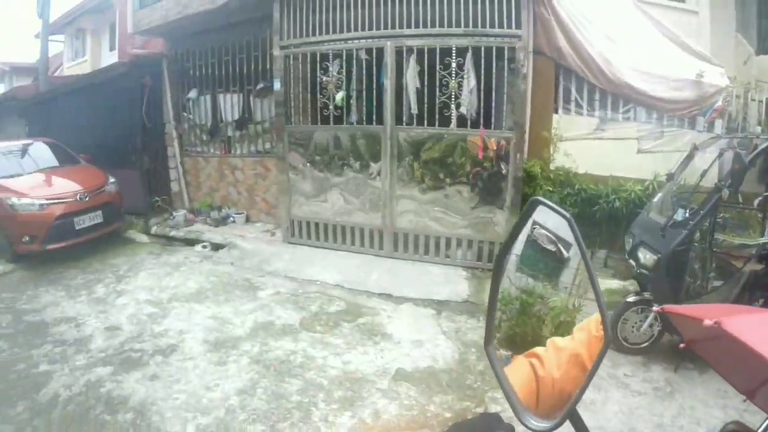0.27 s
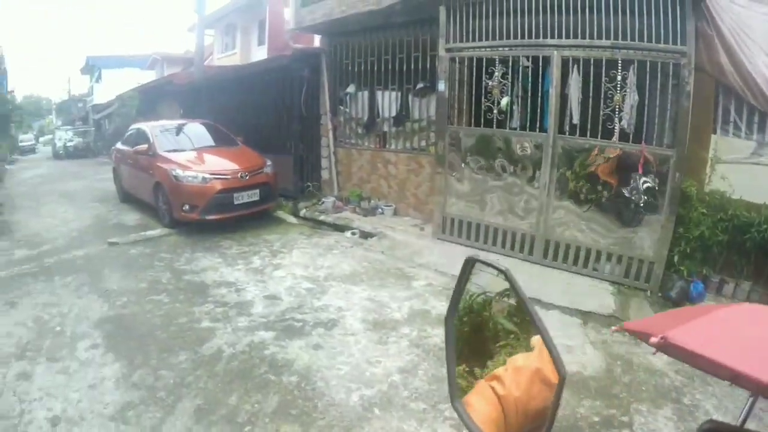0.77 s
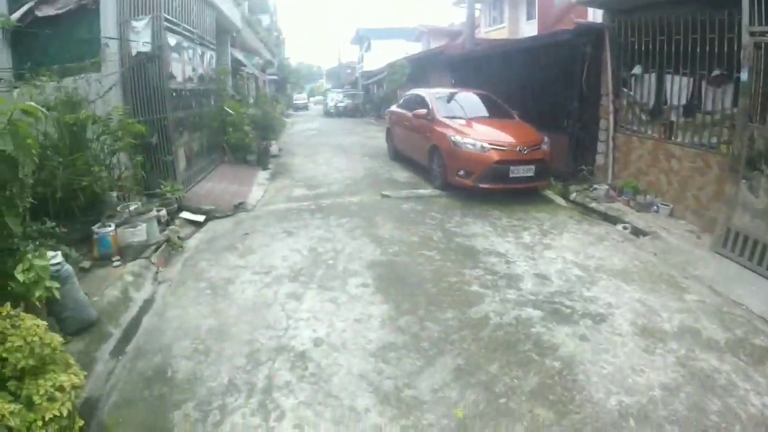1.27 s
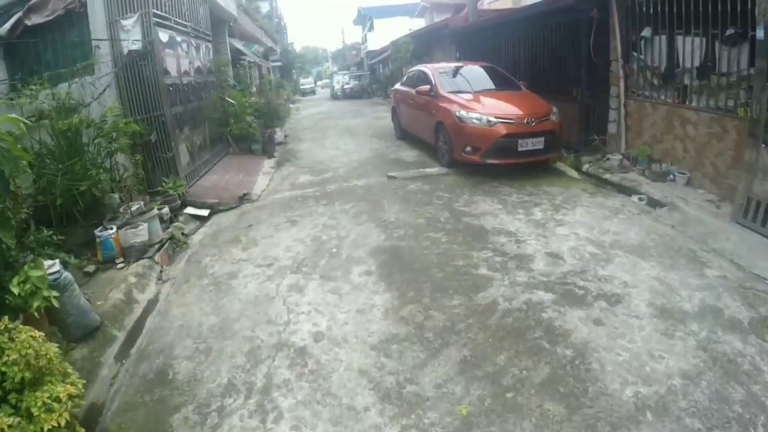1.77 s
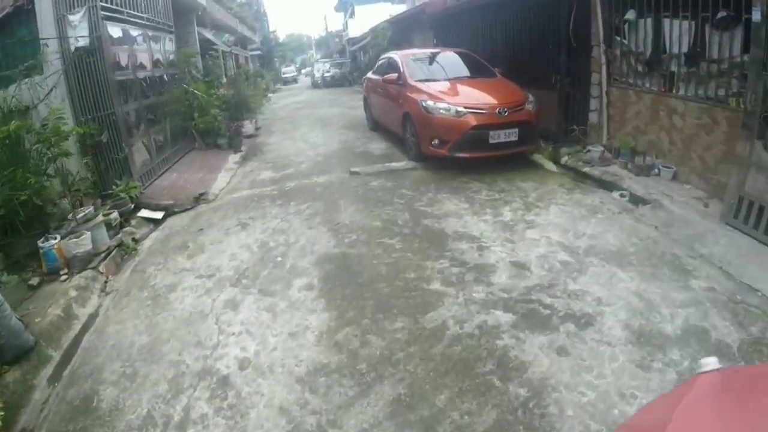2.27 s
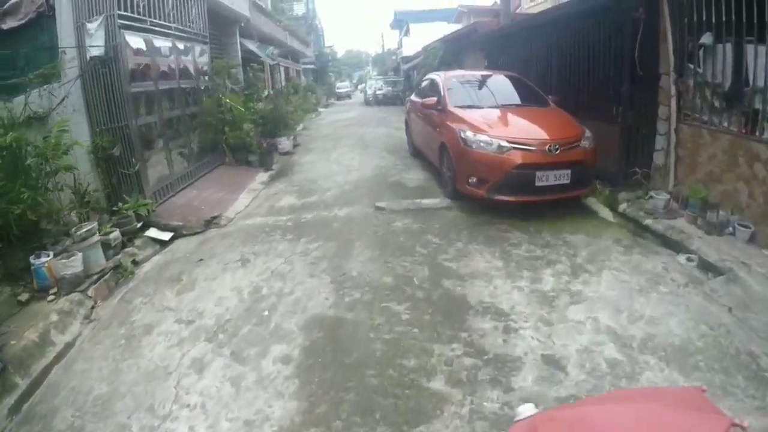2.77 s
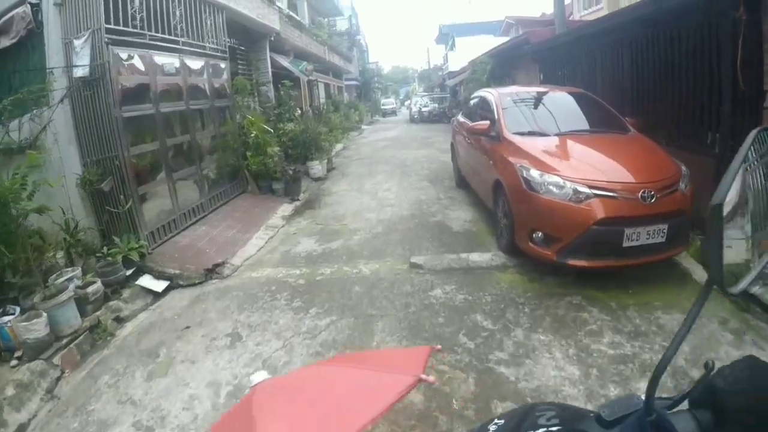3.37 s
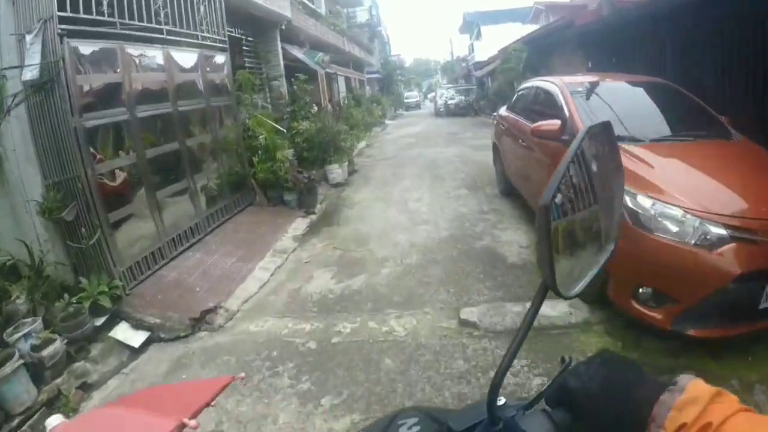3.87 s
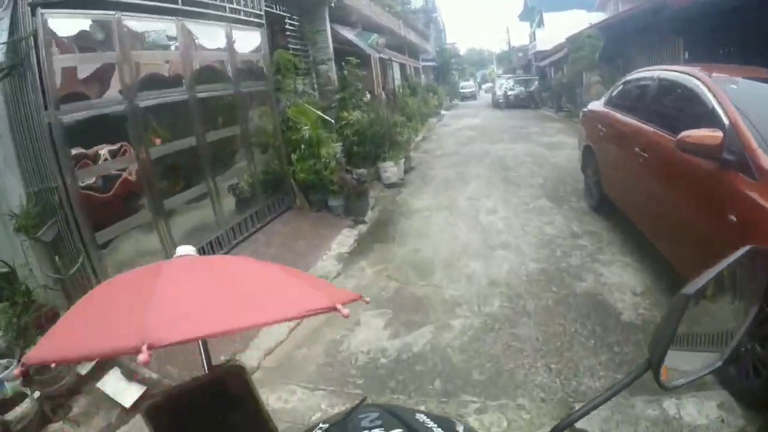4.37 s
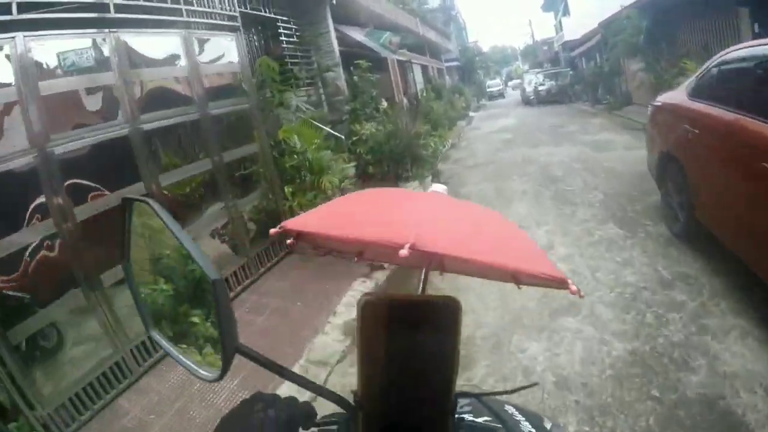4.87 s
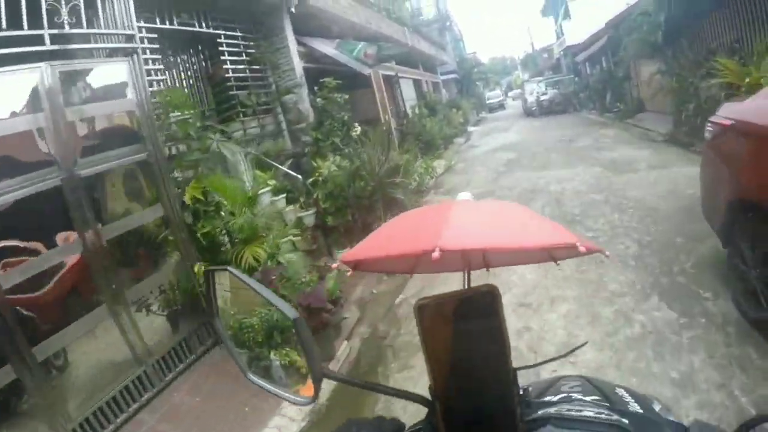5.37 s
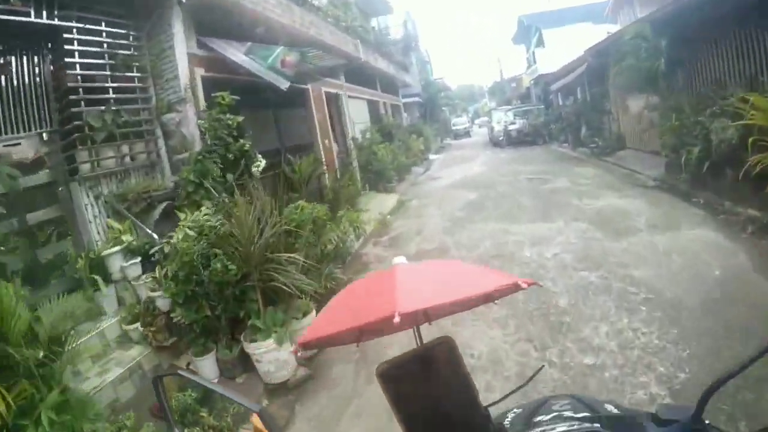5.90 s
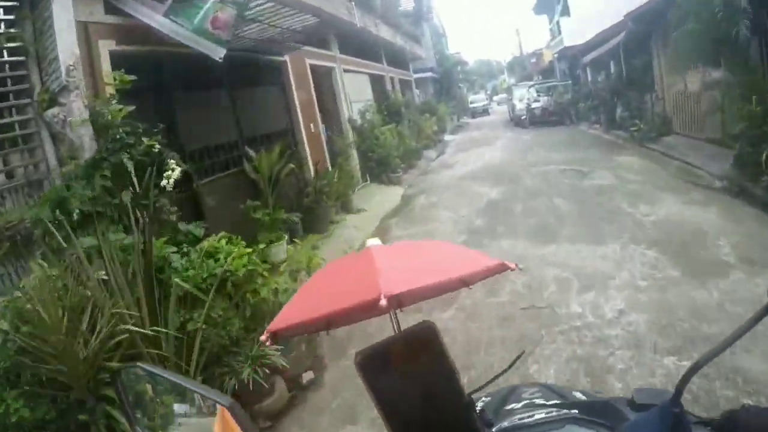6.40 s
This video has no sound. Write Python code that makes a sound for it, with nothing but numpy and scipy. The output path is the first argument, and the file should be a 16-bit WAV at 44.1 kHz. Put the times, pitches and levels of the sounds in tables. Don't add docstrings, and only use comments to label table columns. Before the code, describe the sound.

Low puttering single-cylinder engine rises to a barking drone, eases off with knocking, then surges again amid clatter, squeaks, deep buffeting and one faint dog yelp.

```python
import sys
import numpy as np
from scipy import signal
from scipy.fft import rfft, irfft, next_fast_len
from scipy.io import wavfile

SR = 44100
rng = np.random.default_rng(int(sys.argv[2]) if len(sys.argv) > 2 else 0)


def boost(x):
    u = np.asarray(x, float) / 20
    return 10 ** u


def digitize_waveform(pressure):
    field = np.atleast_2d(pressure).T
    bounded = np.clip(field, -1, 1)
    quanta = np.round(bounded * 32767).astype(np.int16)
    wavfile.write(sys.argv[1], SR, quanta)


N = 292824

FIRE_AT, THUMP_AT, RING_AT = 0.54, 0.72, 0.1
SLOWEST_HZ = 22.4


def rms_one(x):
    return x / np.sqrt(np.mean(x ** 2) + 1e-20)


def in_time(rows):
    s, *columns = np.transpose(rows)
    return [np.interp(np.arange(N) / SR, s, c) for c in columns]


def swells(rows, height=boost):
    t, out = np.arange(N) / SR, np.zeros(N)
    for s, length, db in rows:
        first = max(int((s - length / 2) * SR), 0)
        near = slice(first, int((s + length / 2) * SR))
        out[near] += height(db) * np.cos(np.pi * (t[near] - s) / length) ** 2
    return out


def drift(rate):
    knots_per_s = 40
    knots = rng.standard_normal(int(N / SR * knots_per_s) + 400)
    r = np.exp(-2 * np.pi * rate / knots_per_s)
    slow = signal.lfilter([1], [1, -2 * r, r * r], knots)[390:]
    return np.interp(np.arange(N) / SR * knots_per_s, np.arange(len(slow)), rms_one(slow))


def humps(hz, modes):
    return sum(db / (1 + (2 * (hz - centre_hz) / width_hz) ** 2) for centre_hz, width_hz, db in modes)


def body(x, spectrum, modes=()):
    size = 2 ** 15
    full = next_fast_len(N + size)
    hz = np.maximum(np.fft.rfftfreq(size, 1 / SR), 1)
    points = np.array(spectrum)
    level_db = np.interp(np.log(hz), np.log(points[:, 0]), points[:, 1], left=-70, right=-70)
    level_db = level_db + humps(hz, modes)
    cepstrum = irfft(np.log(boost(level_db)))
    cepstrum[1:size // 2] *= 2
    cepstrum[size // 2 + 1:] = 0
    response = irfft(np.exp(rfft(cepstrum)))
    return irfft(rfft(x, full) * rfft(response, full), full)[:N]


def beat(cycles, count, depth, sharp):
    return rms_one(1 - depth + depth * sharp * np.exp(-sharp * (cycles * count % 1)))


def knock(s, level_db, hz, t60):
    out, t = np.zeros(N), np.arange(12000) / SR
    envelope = boost(level_db - 60 * t / t60) * (1 - np.exp(-2 * hz * t))
    out[round(s * SR):][:len(t)] = envelope * np.sin(2 * np.pi * hz * t)
    return out


def tap(s, level_db, low_hz, high_hz, t60):
    out, t = np.zeros(N), np.arange(4000) / SR
    band = signal.butter(2, [low_hz, high_hz], "band", fs=SR, output="sos")
    noise = rms_one(signal.sosfilt(band, rng.standard_normal(len(t))))
    envelope = boost(level_db - 60 * t / t60) * (1 - np.exp(-t / 0.00027))
    out[round(s * SR):][:len(t)] = noise * envelope
    return out


def level(part, throttle_db):
    idle_db = {"low": -40, "bark": -52.5, "howl": -59, "tick": -69.5, "clatter": -52, "hiss": -55.0, "ring":
               -58.5}
    follows = {"low": 0.31, "howl": 0.59, "tick": 0.11, "clatter": 0.81, "hiss": 0.46, "ring": 0.67}
    roll_db_per_s = {"low": .5, "tick": 2, "clatter": 0.2649, "hiss": .5, "ring": 1}
    pull_away_s = 0.49
    rolling_s = np.maximum(np.arange(N) / SR - pull_away_s, 0)
    return idle_db[part] + follows.get(part, 1) * throttle_db + roll_db_per_s.get(part, 0) * rolling_s


def low_thump_db(rate_hz, throttle_db):
    # (middle [s], length [s], change [dB])
    falters = [(.08, .35, -9), (.6, 0.95, -4), (1.52, 0.28, 0), (2.7, 0.28, -1), (5.65, 0.22, -3),
               (3.22, .08, -3), (3.78, 0.13, -7), (5.17, .08, -6), (6.07, 0.063, -2), (1.8, 0.24, -4),
               (4.22, 0.69, -5), (5.4, .3, -0.5), (5.8, .25, -3), (6.58, 0.4, -5.5)]
    lug_db_per_hz, lug_hz = -6.5, 21.65
    slip_s, slip_length_s, slip_db = 1.86, 1, -7.5
    level_db = level("low", throttle_db) - 3 + swells(falters, float)
    level_db = level_db + lug_db_per_hz * np.minimum(rate_hz - lug_hz, 0)
    return level_db + slip_db * swells([(slip_s, slip_length_s, 0)])


def exhaust(cycles, rate_hz, clean, low_db, bark_db):
    # (multiple of firing rate, level [dB])
    low_orders = [(2, 5.5), (3, -2), (4, 2), (5, -2), (6, -12)]
    # (multiple of firing rate, level [dB])
    pipe_orders = [(6, -47), (7, -46), (8, -50), (9, -46), (10, -42), (11, -44), (12, -45), (13, -47),
                   (14, -47), (15, -47), (16, -46), (17, -44), (18, -49), (19, -44), (20, -45), (21, -48),
                   (22, -51), (23, -52)]
    # (centre [Hz], width [Hz], lift [dB])
    pipe_humps = [(408, 40, 10.5), (290, 36, 2.5)]
    # (frequency [Hz], level [dB per Hz])
    pipe = [(150, -92), (190, -6.5), (235, -1.5), (290, 0), (415, -4), (560, -3), (800, -6), (1000, -13),
            (1500, -55)]
    hum, lines = 0, 0
    for k, db in low_orders:
        turns = k * (cycles - THUMP_AT) + 0.07 * drift(4)
        hum = hum + boost(db + 2.2 * drift(7)) * np.cos(2 * np.pi * turns)
    for k, db in pipe_orders:
        turns = k * (cycles - RING_AT) + 0.6 * rng.random()
        line_db = db + humps(k * rate_hz, pipe_humps) + 1.2 * drift(7)
        lines = lines + boost(line_db) * np.sin(2 * np.pi * turns)
    puffs = rng.standard_normal(N) * beat(cycles - FIRE_AT, count=1, depth=0.45, sharp=2.3)
    puffs = puffs * boost(0.8 * drift(12))
    bark = np.sqrt(clean) * rms_one(lines) + np.sqrt(1 - clean) * rms_one(body(puffs, pipe))
    return boost(low_db) * hum + boost(bark_db) * bark


def howl_level_db(rate_hz, throttle_db):
    # (middle [s], length [s], howl [dB])
    surges = [
        (1.75, .9, 0),
        (2.8, 3.1, -2.5),
        (4.85, 0.7, 3.5),
        (5.55, 0.49, -4),
        (6.4, 1.3, 3),
    ]
    gulp_db_per_db, gulp_s, howl_db_per_hz = 0.08, 0.32, 1.7
    lag = int(gulp_s * SR)
    earlier_db = np.pad(throttle_db, (lag, 0), "edge")[:N]
    gulp_db = gulp_db_per_db * (throttle_db - earlier_db)
    speed_db = howl_db_per_hz * (rate_hz - SLOWEST_HZ)
    return level("howl", throttle_db) + speed_db + gulp_db + swells(surges, float)


def intake(cycles, clean, howl_db):
    # (frequency [Hz], level [dB per Hz])
    air_box = [(700, -35), (900, -2), (1050, -5), (1260, -4.5), (1320, -24), (1450, -8), (1700, -39)]
    # (centre [Hz], width [Hz], lift [dB])
    air_box_modes = [(930, 48, 5.5), (1151, 164, 10), (1424, 160, 12)]
    gulps = np.diff(np.floor(cycles - FIRE_AT), prepend=0) * boost(3.0 * rng.standard_normal(N))
    gulps = gulps + 1.7 * np.diff(np.floor(cycles - RING_AT), prepend=0)
    air = rng.standard_normal(N) * boost(2.5 * drift(27))
    ringing, rushing = [rms_one(body(x, air_box, air_box_modes)) for x in (gulps, air)]
    return boost(howl_db) * (np.sqrt(0.4 * clean) * ringing + np.sqrt(1 - 0.4 * clean) * rushing)


def casing(cycles, tick_db, clatter_db, hiss_db):
    # (frequency [Hz], level [dB per Hz])
    casing_colour = [(400, -9.5), (800, -5), (1300, -1.5), (2000, -7.5), (2200, -14.5), (3000, -8),
                     (4000, -17.5), (6000, -39)]
    # (centre [Hz], width [Hz], lift [dB])
    casing_modes = [(1553, 42, 5), (1830, 320, 6), (2414, 570, 12), (2880, 84, 5.5)]
    # (frequency [Hz], level [dB per Hz])
    fins = [(2000, -1), (3300, 4.5), (5000, -0.5), (6200, -9), (8000, -9.5), (11000, -17.5), (13500, -21),
            (15500, -15)]
    # (centre [Hz], width [Hz], lift [dB])
    fin_modes = [(3690, 110, 3), (4070, 90, 3), (4400, 120, 2), (4790, 150, 4), (5600, 200, 7),
                 (6750, 280, 4), (9700, 280, 3)]
    flicker = boost(0.6 * drift(10))
    rattle = rng.standard_normal(N) * beat(cycles - FIRE_AT, count=2, depth=0.16, sharp=3.5)
    rattle = rattle * flicker * boost(0.8 * drift(24))
    clatter = rms_one(body(rattle, casing_colour, casing_modes))
    hiss = rms_one(body(rng.standard_normal(N) * flicker, fins, fin_modes))
    seat = rng.standard_normal(N) * np.exp(-5 * ((cycles - FIRE_AT) % 1)) * boost(2.7 * drift(12))
    tick = rms_one(body(seat, fins, fin_modes))
    return boost(clatter_db) * clatter + boost(hiss_db) * hiss + boost(tick_db) * tick


def covers(ring_db):
    # (note [Hz], width [Hz], level [dB])
    cover_notes = [(1540, 45, -4), (1780, 60, -2), (1880, 60, -2), (1970, 70, 0), (2400, 60, -4),
                   (2640, 50, -1), (2890, 35, -5), (3690, 45, -11), (4075, 40, -12), (4390, 55, -12),
                   (4770, 50, -11), (5640, 110, -11), (6780, 150, -19)]
    fits_db, fits_per_s, narrow = 4.2, 8, 0.75
    shake, out = rng.standard_normal(N), 0
    for hz, width_hz, db in cover_notes:
        r = np.exp(-np.pi * narrow * width_hz / SR)
        ring = signal.lfilter([1, 0, -1], [1, -2 * r * np.cos(2 * np.pi * hz / SR), r * r], shake)
        out = out + boost(db + fits_db * drift(fits_per_s)) * rms_one(ring)
    return boost(ring_db) * rms_one(out)


def pinking():
    # (time [s], peak level [dB])
    knock_strength = [
        (2.8225, -48),
        (2.9, -45),
        (2.9762, -32.5),
        (3.1, -33),
        (3.17, -38),
        (3.36, -33),
        (3.4, -34),
        (3.44, -30.5),
        (3.48, -35),
        (3.53, -39),
    ]
    gap_s, scatter_s, scatter_db = 0.0385, 0.001, 1.5
    s, db = np.transpose(knock_strength)
    raps = np.arange(s[0], s[-1], gap_s)
    chance = rng.standard_normal((len(raps), 2)) * [scatter_s, scatter_db]
    hits = np.transpose([raps, np.interp(raps, s, db)]) + chance
    out = np.zeros(N)
    for rap_s, rap_db in hits:
        out += tap(rap_s, rap_db - 6, 420, 680, 0.12)
        out += tap(rap_s, rap_db - 6, 800, 3000, 0.07)
        out += tap(rap_s, rap_db - 12, 3500, 7200, 0.05)
        out += tap(rap_s, rap_db - 24, 7500, 11000, 0.03)
    return out


def squeaks():
    # (start [s], length [s], pitch [Hz], level [dB rms])
    rubs = [(.25, .25, 5600, -62), (4.74, .1, 4750, -54), (4.84, .3, 4800, -54), (5.03, .1, 4800, -53),
            (4.64, .12, 2550, -50), (5.08, .14, 2610, -46), (5.45, .12, 2900, -48), (5.74, .05, 2680, -45),
            (5.75, .22, 5650, -53), (5.82, .16, 1760, -45), (5.95, .15, 1950, -48), (6.34, .17, 2380, -49),
            (5.12, .3, 620, -46), (3.12, .18, 365, -45), (4.86, .14, 400, -45), (5.3, .25, 1900, -46),
            (5.7, .14, 3700, -52), (5.95, .06, 4700, -50), (5.955, .04, 4300, -50), (6.28, .05, 1110, -47),
            (6.34, .05, 1120, -47), (6.08, .1, 10300, -61), (6.3, .1, 4050, -52)]
    out = np.zeros(N)
    for s, length, hz, level_db in rubs:
        size = int(length * SR)
        band = signal.butter(1, [0.993 * hz, 1.007 * hz], "band", fs=SR, output="sos")
        rub = rms_one(signal.sosfilt(band, rng.standard_normal(size + 2000))[2000:])
        swell = np.sin(np.pi * np.arange(size) / size)
        out[int(s * SR):][:size] += boost(level_db) * swell * rub
    return out


def lane(x):
    # (delay [s], level [dB])
    wall_echoes = [
        (.0113, -21),
        (.0187, -21),
        (.0291, -22),
        (.043, -23),
    ]
    echoes = sum(boost(db) * np.pad(x, (int(s * SR), 0))[:N] for s, db in wall_echoes)
    return rms_one(x + echoes) * np.std(x)


def mount(rate_hz):
    # (middle [s], length [s], level [dB rms])
    jolts = [(.05, 0.43, -29), (.3, 0.4, -25), (.581, 0.25, -17), (.823, 0.35, -12.5), (1.03, 0.1, -22.5),
             (1.211, 0.21, -15.5), (1.42, 0.4, -17.5), (1.65, 0.15, -29), (2.1, 0.91, -23),
             (2.67, 0.3, -11.5), (2.976, 0.47, -14), (3.138, 0.22, -16), (3.347, 0.36, -15.5),
             (3.507, 0.22, -14.5), (3.721, 0.31, -19), (3.848, 0.18, -18), (4.037, 0.18, -21),
             (4.148, 0.073, -14.5), (4.298, 0.25, -20), (4.587, 0.49, -17), (4.835, 0.5, -17.5),
             (5.06, 0.25, -14.5), (5.296, 0.36, -9.5), (5.519, 0.21, -19.5), (5.659, 0.24, -16.5),
             (5.785, 0.16, -24), (5.963, 0.43, -21), (6.121, 0.1, -14.5), (6.29, 0.29, -17.5),
             (6.55, 0.5, -20)]
    jolt_hz = [30.3, 31, 28.1, 29.2, 29.1, 31.5, 30, 29.4, 29.2, 29.3, 28.1, 27.2, 28.2, 29.6, 29.8, 29.2,
               29, 27.1, 30.3, 26.4, 27, 28.3, 27.7, 29.1, 28, 26, 29.1, 27.9, 27.5, 27]
    reversals_s = [.49, .975, 3.215, 4.95, 5.41, 6.06, 6.385, 6.64]
    mount_hz, mount_width_hz, reversal_s = 28.805, 1.49, 0.03
    boom_db, rest_db, wobble_db = -4.6, -48, 0.4
    tuned = 1 / (1 + ((rate_hz - mount_hz) / mount_width_hz) ** 2) ** 3
    t = np.arange(N) / SR
    hz = np.interp(t, np.transpose(jolts)[0], jolt_hz) + 1.3 * drift(8) * (1 - tuned)
    swing = (boost(rest_db) + swells(jolts)) * boost(2.2 * drift(9))
    swing = swing + boost(boom_db + wobble_db * drift(18)) * tuned
    sense = np.prod([np.tanh((t - s) / reversal_s) for s in reversals_s], axis=0)
    return np.sqrt(2) * sense * swing * np.sin(2 * np.pi * np.cumsum(hz) / SR)


def road_shake():
    # (frequency [Hz], level [dB per Hz])
    road = [(20, -38), (36, 3), (48, 4), (60, 3.5), (90, -4.5), (130, -14), (170, -19), (260, -26),
            (500, -45.5)]
    # (middle [s], length [s], level [dB rms])
    patches = [(.01, 0.11, -21.5), (.43, 0.53, -31), (.69, 0.046, -22), (.78, 0.22, -31), (.93, 0.23, -25),
               (1.1, 0.35, -23.5), (1.27, 0.14, -26), (1.45, 0.29, -42), (2.0, 0.96, -32),
               (2.22, .1, -45.5), (2.37, 0.14, -33), (2.64, 0.051, -46), (2.85, 0.1, -53),
               (3.07, 0.19, -35), (3.26, 0.063, -26), (3.41, 0.1, -41), (3.92, 0.69, -29.5),
               (4.15, 0.38, -34), (4.44, 0.46, -34), (4.65, 0.75, -40), (5.18, 0.1, -22), (5.5, 0.21, -46),
               (5.95, 0.26, -41), (6.07, .2, -51), (6.4, 0.78, -35)]
    smooth_road_db = -36
    lumps = boost(4 * drift(18)) * rng.standard_normal(N)
    return (boost(smooth_road_db) + swells(patches)) * boost(-2) * rms_one(body(lumps, road))


def bumps():
    # (time [s], peak level [dB], thud [Hz], fall by 60 dB [s])
    thuds = [(0.37, -21, 111, 0.081), (0.375, -32, 257, 0.08), (0.895, -32, 262, 0.093),
             (0.925, -25.5, 146, 0.16), (0.941, -30.5, 238.5, 0.17), (0.964, -9.5, 67.5, 0.088),
             (0.982, -37, 245, 0.088), (1.076, -22.5, 91.6, 0.16), (1.08, -28, 170, 0.085),
             (1.113, -19, 121, 0.13), (1.119, -32, 210, 0.07), (1.165, -29, 127, 0.19),
             (1.25, -32, 127, .2), (1.141, -34, 187, 0.1), (5.763, -29, 570, 0.036), (3.8, -37, 255, 0.061),
             (3.944, -25, 110, .1), (3.961, -30, 179, 0.079), (4.069, -37, 256, 0.11),
             (4.087, -34, 134, .12), (4.19, -30, 140, 0.08)]
    # (time [s], peak level [dB], pitch [Hz], fall by 60
    # dB [s])
    pings = [
        (1.2, -42, 4520, 0.047),
        (1.121, -36, 670, .09),
        (.375, -37, 470, .07),
        (.376, -39, 640, .06),
        (2.823, -53, 9800, .02),
        (2.898, -52, 9600, .02),
        (5.757, -38, 2670, .08),
        (2.978, -49, 9700, 0.021),
        (3.016, -50, 9900, .02),
        (3.053, -50, 9800, 0.016),
    ]
    # (time [s], level [dB rms], lowest [Hz],
    # highest [Hz], fall by 60 dB [s])
    panel_taps = [(.376, -41, 200, 900, .07), (.893, -46, 1000, 3500, .03), (.945, -38, 700, 3800, .04),
                  (1.121, -46, 2000, 3300, .03), (1.121, -44, 900, 1500, .05), (.377, -47, 1000, 1300, .06),
                  (.9, -48, 1200, 1700, .12), (1.122, -39, 1550, 2050, .09), (1.147, -44, 1500, 2800, .05),
                  (0, -42, 200, 1000, .08), (4.781, -41, 1500, 4000, .04), (5.345, -39, 2700, 3100, .05),
                  (5.623, -37, 1700, 2200, .05), (5.664, -38, 1600, 3200, .04),
                  (6.022, -40, 1400, 2500, .05), (5.424, -39, 1300, 2200, .05),
                  (3.4395, -50, 7000, 12000, .04), (4.742, -39, 800, 5000, .04),
                  (4.938, -40, 1000, 7500, .03), (5.212, -35, 600, 2300, .07),
                  (5.762, -45, 3500, 15200, .04), (2.627, -40, 2000, 3000, .04),
                  (4.245, -45, 2000, 3000, .04), (4.817, -39, 2300, 2900, .05),
                  (4.902, -39, 2300, 2900, .05), (5.105, -39, 2350, 2850, .07),
                  (5.169, -40, 2350, 2850, .07), (5.254, -38, 2300, 3000, .05),
                  (6.432, -40, 2000, 3200, .04), (5.758, -37, 450, 3000, .06)]
    rings = sum(knock(*hit) for hit in thuds) + sum(knock(*hit) for hit in pings)
    return rings + sum(tap(*hit) for hit in panel_taps)


def roadside():
    # (time [s], level [dB])
    leaves = [
        (6.05, -81),
        (6.1, -56),
        (6.22, -54),
        (6.28, -65),
    ]
    # (time [s], pitch [Hz], level [dB rms])
    yelp_path = [
        (6.28, 604, -70),
        (6.33, 594, -52),
        (6.38, 607, -55),
        (6.41, 580, -65),
        (6.44, 606, -54),
        (6.5, 603, -41.5),
        (6.55, 600, -52.5),
        (6.61, 610, -63),
        (6.64, 600, -66),
    ]
    swish = rms_one(body(rng.standard_normal(N), [(5500, -35), (6800, -10), (10500, -15), (11500, -27)]))
    hz, level_db = in_time(yelp_path)
    trembling_hz = hz + 5.9 * drift(27)
    yelp = np.sqrt(2) * boost(level_db + 1.5 * drift(25)) * np.sin(2 * np.pi * np.cumsum(trembling_hz) / SR)
    return boost(in_time(leaves)[0]) * swish + yelp


def background():
    # (frequency [Hz], level [dB per Hz])
    air_colour = [(3000, -6.5), (5000, -6.5), (8000, -10), (10500, -7.5), (11500, -12), (13500, -9.5),
                  (15500, -21)]
    # (pitch [Hz], level [dB rms])
    whines = [(11700, -85), (13700, -86)]
    air_db = -58
    t = np.arange(N) / SR
    whine = sum(np.sqrt(2) * boost(db) * np.sin(2 * np.pi * hz * t) for hz, db in whines)
    return boost(air_db) * rms_one(body(rng.standard_normal(N), air_colour)) + whine


def scene():
    # (time [s], firings per second [Hz])
    firing = [(0, 23.3), (.4, 21.3), (1.29, 23.7), (1.5, 27.9), (1.61, 29.0), (1.87, 29.6), (2.2, 29.35),
              (2.66, 28.0), (2.79, 26.8), (3.48, 25.2), (3.64, 23.6), (4.2, 21.1), (4.45, 22.2),
              (4.62, 25.7), (5.55, 25.0), (5.85, 23.6), (6.3, 22.9), (6.64, 19.8)]
    # (time [s], level [dB])
    throttle = [(0, -1.5), (.87, -0.5), (1.1, 1.5), (1.3, 6.5), (1.49, 15.5), (1.8, 14), (2.38, 14),
                (2.47, 11.5), (3.27, 11), (3.5, 11.5), (3.65, 5.5), (4.3, 3.5), (4.88, 10.5), (5.28, 12),
                (5.63, 9), (5.8, 6), (6.64, 3)]
    rate_hz, throttle_db = in_time(firing)[0], in_time(throttle)[0]
    cycles = np.cumsum(rate_hz) / SR
    even_hz, even_share, rough_share = 29.3, 0.77, 0.12
    evenness = np.clip((rate_hz - SLOWEST_HZ) / (even_hz - SLOWEST_HZ), 0, 1) ** 3.5
    clean = rough_share + (even_share - rough_share) * evenness
    overrun_s, overrun_length_s, overrun_db = 5.86, 1.6, 4
    extra_db = overrun_db * swells([(overrun_s, overrun_length_s, 0)])

    tick_db = level("tick", throttle_db)
    clatter_db = level("clatter", throttle_db) + extra_db
    hiss_db = level("hiss", throttle_db) + 0.5 * extra_db
    metal = intake(cycles, clean, howl_level_db(rate_hz, throttle_db))
    metal = metal + casing(cycles, tick_db, clatter_db, hiss_db)
    metal = metal + covers(level("ring", throttle_db) + extra_db)
    metal = metal + pinking() + squeaks()
    low_db, bark_db = low_thump_db(rate_hz, throttle_db), level("bark", throttle_db)
    engine = exhaust(cycles, rate_hz, clean, low_db, bark_db) + lane(metal)
    return (engine + mount(rate_hz) + road_shake() + bumps() + roadside() + background())[None]


def roll_off(x):
    return signal.sosfilt(signal.butter(12, 15200, fs=SR, output="sos"), x)


def record(dry):
    treble_cut = signal.ellip(10, 0.3, 45, 15200, fs=SR, output="sos")
    loud = 1.12 * signal.sosfilt(treble_cut, dry)
    clipped = loud / (1 + loud ** 60) ** (1 / 60)
    return roll_off(clipped)


dry = scene()
out = record(dry)
digitize_waveform(out)
```